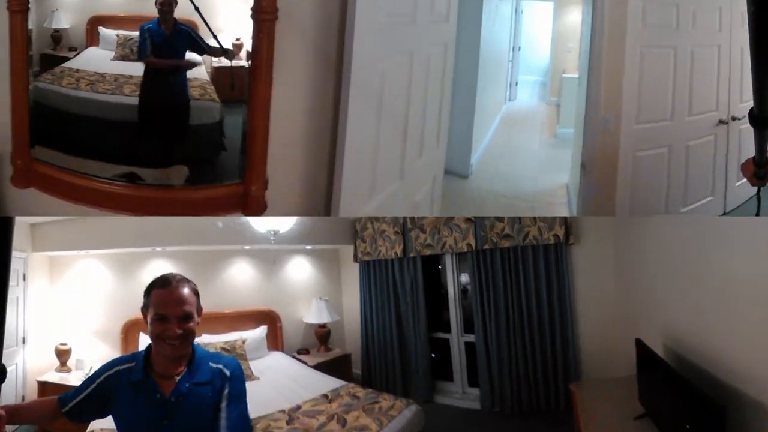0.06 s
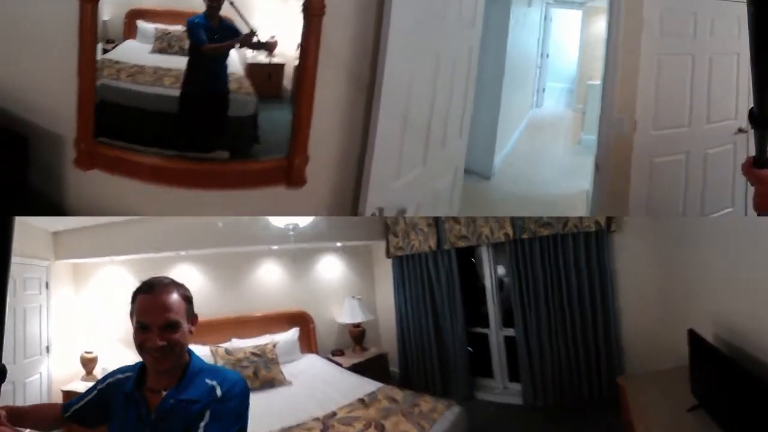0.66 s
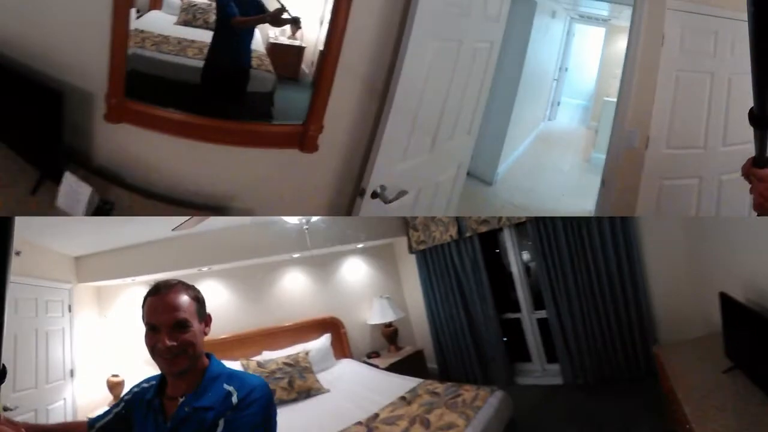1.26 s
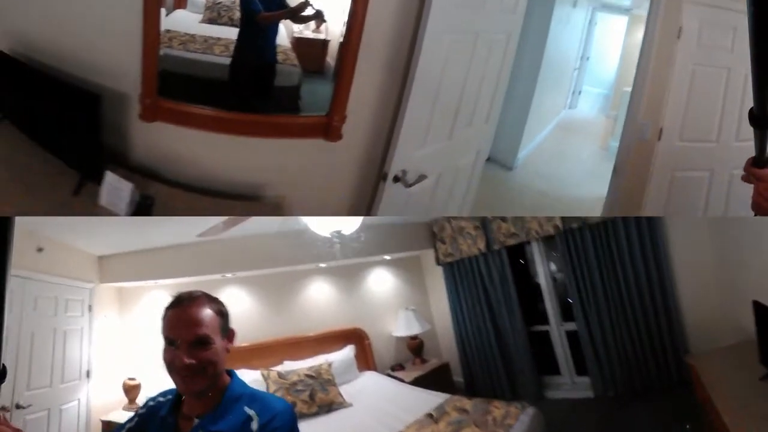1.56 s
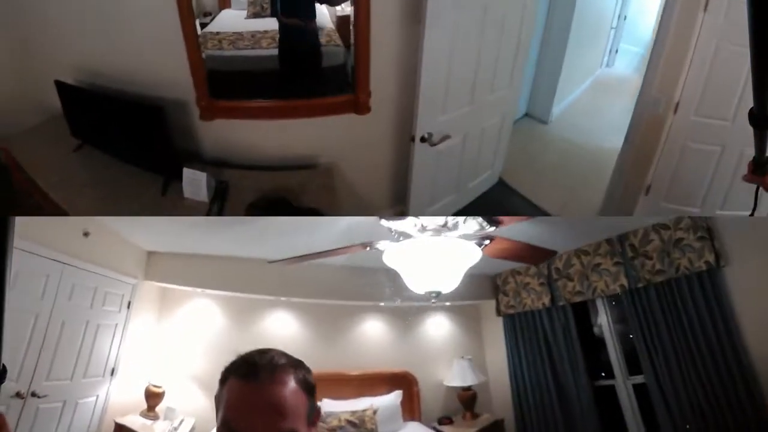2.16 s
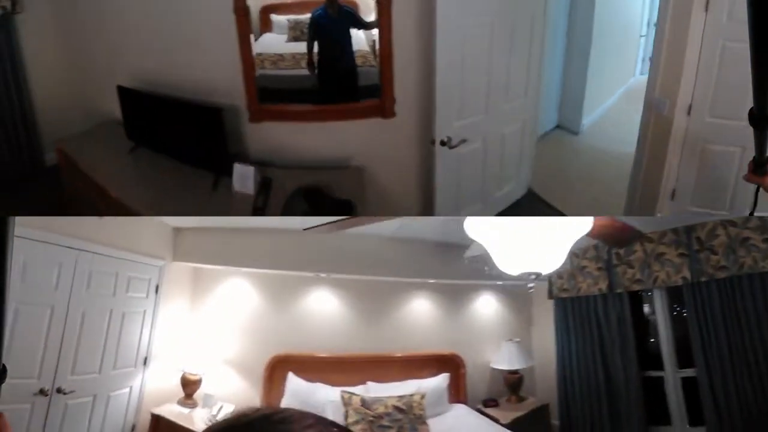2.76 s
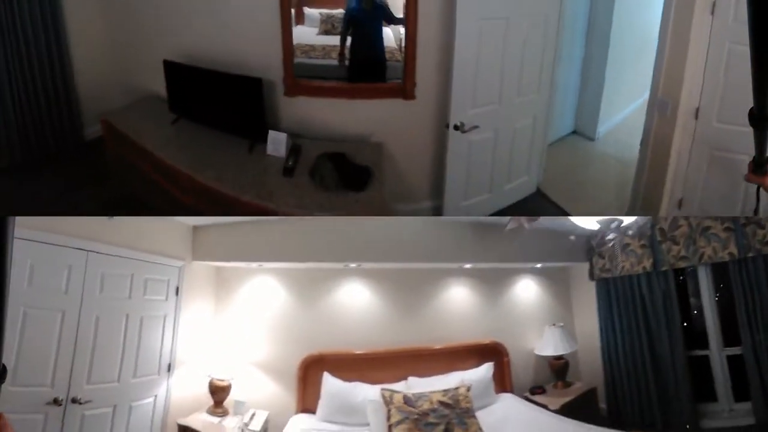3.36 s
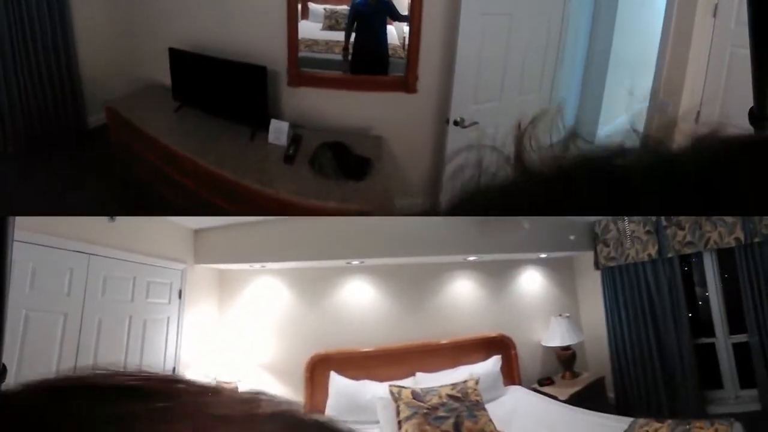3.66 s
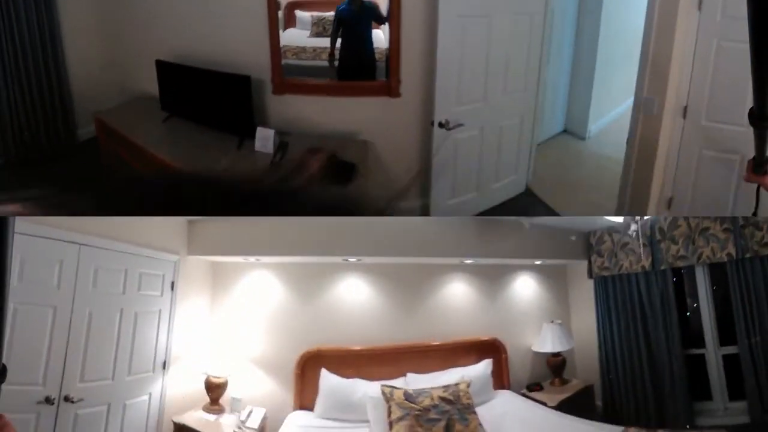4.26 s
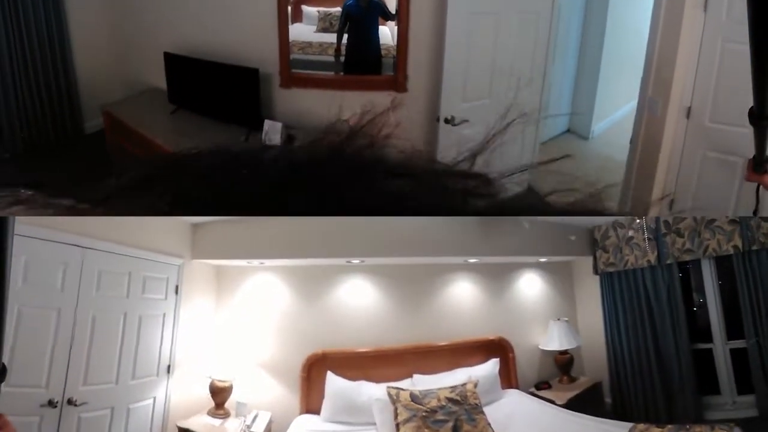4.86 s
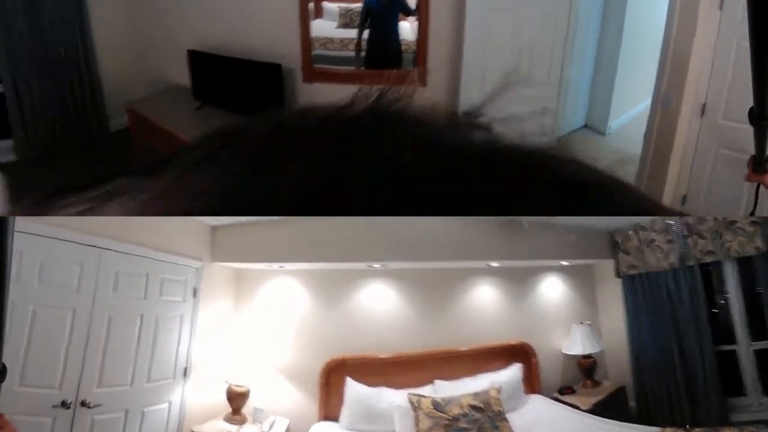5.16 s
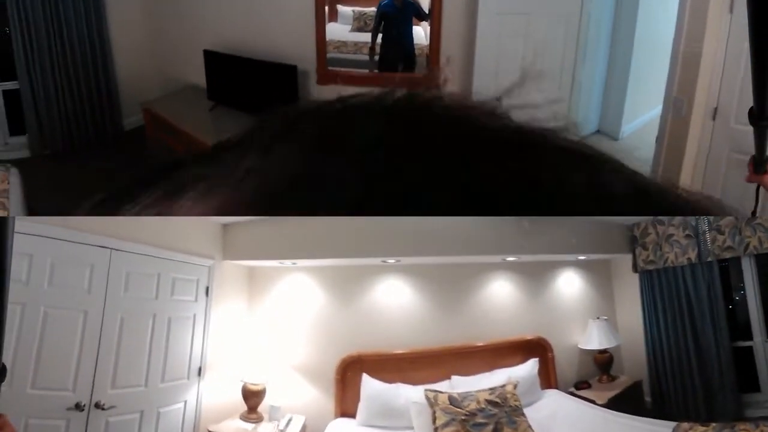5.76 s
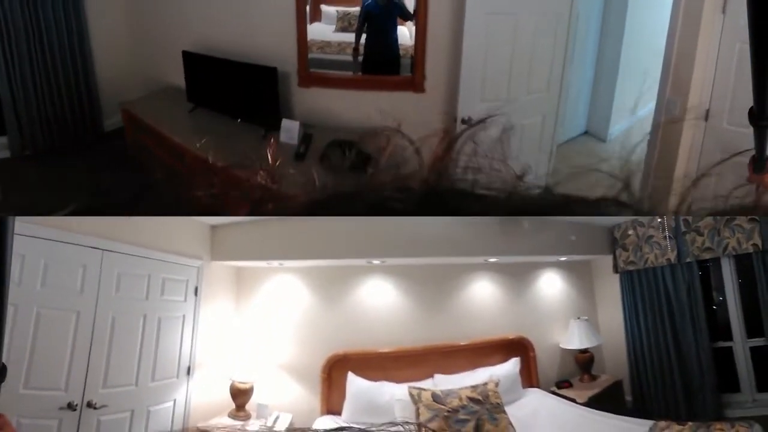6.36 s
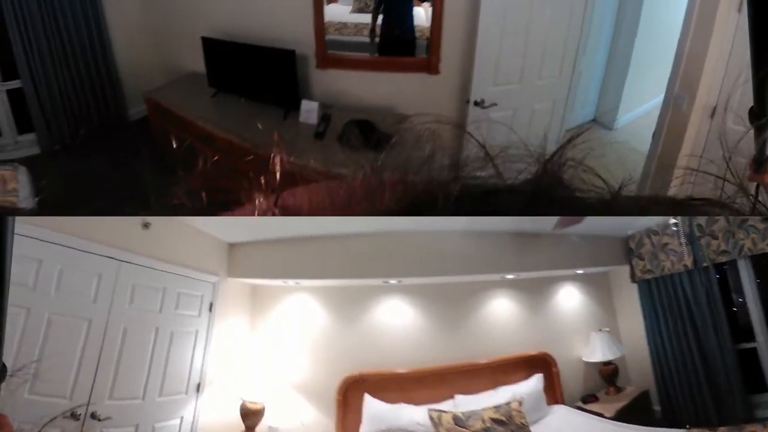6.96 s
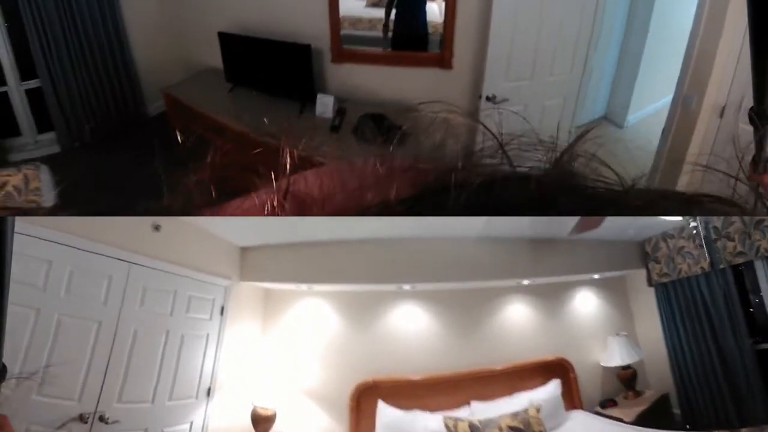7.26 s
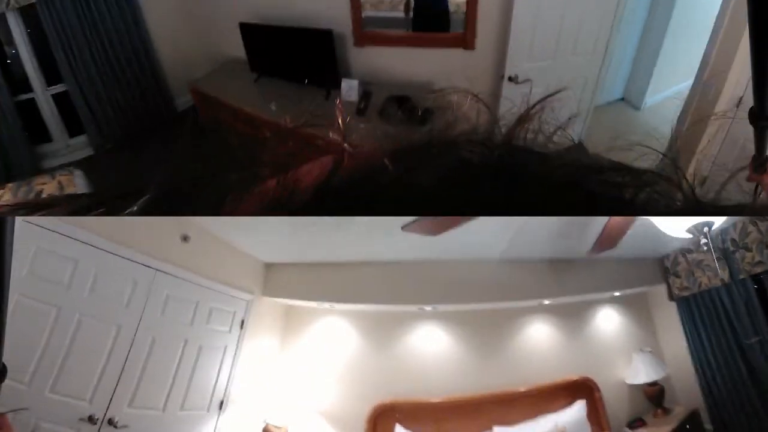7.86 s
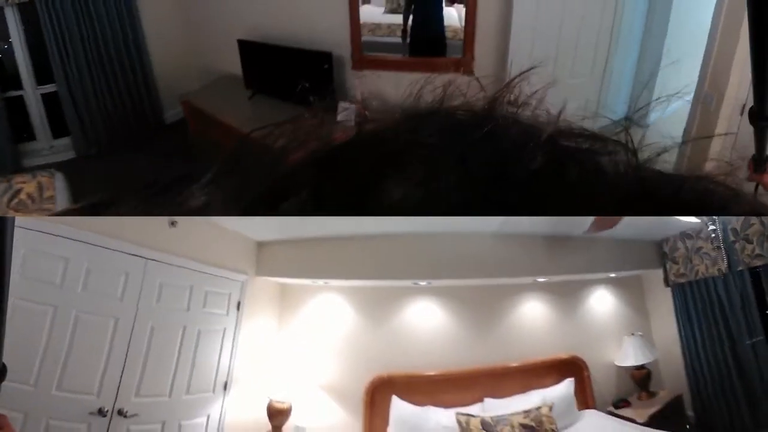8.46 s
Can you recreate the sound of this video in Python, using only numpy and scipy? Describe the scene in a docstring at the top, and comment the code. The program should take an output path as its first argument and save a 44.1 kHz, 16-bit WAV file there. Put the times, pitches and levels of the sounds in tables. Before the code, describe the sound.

Hair scrapes and ticks against a camera on a pole, with handling rumble, creaks and two heavy knocks in a quiet room.

```python
"""Pole camera lowered onto hair

A small camera on a hand-held pole meets a head of hair in a quiet bedroom. Nearly everything reaches
the microphones through the case: the pole hums and creaks in the grip, hair scrapes and ticks on the
shell, fingers tap it, and two heavy knocks overload the input."""
import sys
import numpy as np
from scipy import signal
from scipy.fft import rfft, irfft
from scipy.io import wavfile
from scipy.ndimage import uniform_filter1d

SR = 44100
rng = np.random.default_rng(int(sys.argv[2]) if len(sys.argv) > 2 else 0)


def wav_out(sig):
    """Save sig, one row per channel (or a flat mono array), as 16-bit PCM at SR to the path in sys.argv[1]."""
    wavfile.write(sys.argv[1], SR, np.round(np.clip(np.atleast_2d(sig).T, -1, 1) * 32767).astype(np.int16))


N = 384552
T = np.arange(N) / SR
BIN_HZ = np.arange(N // 2 + 1) * SR / N + 1e-3

# Source spectra. Each row: frequency in Hz, relative level in dB.
VENT_SPECTRUM = [(20, -3), (55, 14), (110, 7.5), (200, -10.5), (300, -19), (400, -4.5), (600, -17),
                 (1000, -12), (1500, -56.5), (4000, -27.5)]
HISS_SPECTRUM = [(100, 15), (1000, 2), (2500, -0.5), (5000, -4), (9000, -6), (14000, -8.5)]
RUMBLE_SPECTRUM = [(12, -16.5), (25, -13.5), (40, -3), (58, 4.5), (80, -7), (105, 4), (135, -9.5),
                   (165, -18.5), (215, -11.5), (280, -21), (350, -16), (450, -30.5), (900, -61)]
SWISH_SPECTRUM = [(500, 5.5), (900, -1), (1600, -4), (2100, -5.5), (3200, -4.5), (4300, -15), (5300, -4),
                  (6000, -5.5), (6900, -2.5), (8300, -20), (14000, -20)]
JOLT_SPECTRUM = [(12, -22), (28, -8.5), (52, 1.5), (80, -4), (140, -15), (220, -27), (600, -64)]
SCUFF_SPECTRUM = [(60, 1), (160, 8), (250, 27), (500, -18), (900, 2.5), (1400, -12.5), (3000, -14),
                  (6000, -43), (14000, -58)]
SLIDE_SPECTRUM = [(50, -39), (130, -11.5), (230, 4.5), (290, -4.5), (360, 7), (480, -8.5), (560, -21),
                  (650, -3), (850, -11), (1100, -23), (1550, -22.5), (2000, -31), (2400, -23), (9000, -66)]
SLIP_SPECTRUM = [(40, -27), (100, -16), (210, 2.5), (280, -2.5), (360, 3), (430, -8), (490, -3.5),
                 (570, -10), (790, -9.5), (950, -23.5), (1200, -46), (4000, -59)]
RATTLE_SPECTRUM = [(200, 5), (500, 5.5), (800, 8), (1300, 1), (2000, -4.5), (3300, -3), (5000, -16),
                   (7200, -11), (9000, -28), (15000, -35)]
TICK_SPECTRUM = [(400, -11), (1100, 0), (1500, 1.5), (2100, 11.5), (2600, 13), (3200, 7.5), (4200, 4.5),
                 (5500, 6.5), (7000, 5), (9000, -4), (15000, -50)]

# Right port against left as the case rocks. Each row: frequency in Hz, phase lag in radians.
PORT_LAG = [(10, 0.4), (50, 0.66), (100, 1.42), (250, 1.81), (600, 1.75), (950, 1.7), (1300, 1.06),
            (2000, -1.8), (3200, -1.71)]
# Modes of pole and case. Each row: nominal frequency in Hz, relative level in dB, free T60 in seconds.
CASE_MODES = [(59, 2.5, 0.4), (105.7, 3.5, 0.43), (143.5, 2.5, 0.15), (223, 0.5, 0.088), (318, 2.5, 0.076),
              (365.2, 0.5, 0.09), (480, -5.5, 0.047), (654, -11.5, 0.085), (763.5, -6, 0.13),
              (860, -0.5, 0.081), (962, -2.5, 0.037), (1224, -0.5, 0.03), (1606, 1, 0.038),
              (2343, 7, 0.081), (2690, 6.5, 0.032), (3460, 2, 0.049)]
# Pole bending modes. Each row: frequency in Hz, width of its wander in Hz, relative level in dB.
POLE_MODES = [(53.54, 3.76, -8.5), (126.5, 7.4, -22)]
# Shell resonances. Each row: frequency in Hz, nominal width in Hz, left and right relative gain in dB.
SHELL_MODES = [(761, 91, 19, 19), (1310, 210, 5.5, 7), (2060, 296, 10.5, 10), (2590, 208, 3.5, 16),
               (3150, 450, 9, 10), (3910, 1340, -1.5, 0.5), (4830, 870, 0.5, -6.5), (6480, 760, 3.5, -30),
               (8160, 2700, -12.5, -18)]

# Envelopes of vent hum, hand tremor and resting hair. Each row: time in seconds, relative level in dB.
HUM_LEVELS = [(0, -63), (1.0, -56.5), (2.0, -63), (2.3, -72), (8.72, -67.5)]
TREMOR_LEVELS = [(1.78, -45.5), (2.078, -52.5), (2.164, -46.5), (2.432, -58), (2.7, -43.5), (3.004, -42),
                 (3.044, -53), (3.12, -68)]
HAIR_REST_LEVELS = [(4.4, -82), (4.5, -68), (5.1, -69), (5.48, -72), (7.1, -72), (7.8, -73), (8.72, -75.5)]

# Rubbing of sleeve, hand and mount.
# Each row: start in seconds, length in seconds, crest position 0-1, relative level in dB.
SLEEVE_SWISHES = [(.29, 0.23, 0.77, -52.5), (1.637, 0.087, 0, -53.5), (1.725, 0.028, .6, -53)]
HAND_SLIDES = [(.655, 0.064, 0.25, -43.5), (.83, 0.13, .55, -43), (.98, 0.25, 0.34, -53),
               (1.28, 0.14, 0.13, -51), (1.465, 0.041, 0.24, -52), (1.57, 0.014, 0.6, -52)]
MOUNT_CREAKS = [(3.2, .18, 0.9, -58), (3.83, .23, 0, -49.5), (4.46, .035, 0.6, -47),
                (4.735, 0.094, 0.3, -46), (4.87, 0.079, 0.4, -46), (5.11, 0.029, .5, -48),
                (5.425, 0.021, 0.4, -50), (5.85, 0.16, 0.6, -50.5), (6.29, 0.26, .9, -45.5),
                (6.91, 0.12, .4, -52.5), (7.19, 0.195, 0, -57), (7.48, 0.23, 0.9, -51),
                (7.725, 0.14, 0.15, -45), (7.89, 0.025, 0.4, -47), (8.05, .18, 0.96, -49.5),
                (8.34, 0.25, 0.9, -57.5)]
# Hair crossing the shell. Each row: the same four, then relative treble in dB.
HAIR_STROKES = [(4.59, 0.56, .3, -64.5, -5), (5.142, .11, 0.35, -64.5, 4), (5.28, .045, 0.5, -66, 6),
                (5.363, 0.061, 0.26, -60, 5), (5.503, .19, 0.04, -61.5, 2), (5.808, 0.18, 0.51, -51, -6.5),
                (6.1, 0.25, 0.17, -60, -6.5), (6.362, .16, 0.73, -48.5, -6.5),
                (6.616, .075, 0.13, -55.5, -6.5), (7.194, 0.12, 0.4, -62, -11), (7.286, .12, 0.12, -57, -2),
                (7.44, 0.057, 0.7, -64.5, -9), (7.512, 0.1, 0.1, -53.5, -5.5), (7.87, 0.26, 0.37, -65, -2),
                (8.296, 0.15, 0, -65.5, -1.5)]

# Single jolts, thuds and slips. Each row: start in seconds, relative level in dB.
HAND_JOLTS = [(.6, -47), (0.664, -36.5), (.87, -44), (1.27, -53), (1.73, -42), (3.168, -46), (3.4, -48),
              (3.62, -43.5), (3.784, -35), (3.84, -40), (3.93, -53), (4.17, -47.5), (4.51, -45.5),
              (4.69, -44), (5.55, -46), (5.77, -45.5), (5.935, -41.5), (6.093, -37.5), (6.2, -50),
              (6.3, -40.5), (6.45, -36.5), (6.6, -47), (6.81, -53), (6.95, -52), (7.105, -44.5)]
PALM_THUDS = [(0.687, -35), (1.253, -37), (1.568, -38.5), (1.651, -28), (1.728, -32.5)]
MOUNT_SLIPS = [(3.259, -38.5), (3.924, -42), (3.951, -35), (4.005, -37.5), (4.153, -43.5), (4.691, -32),
               (4.734, -32), (4.757, -31), (4.78, -33.5), (4.8, -29.5), (4.828, -33.5), (4.871, -33.5),
               (4.919, -33.5), (6.296, -44), (7.822, -40), (7.895, -36.5)]
# Taps on pole and case. Each row: start in seconds, then relative level, bass, upper mid, treble in dB.
FINGER_TAPS = [(0.606, -34.5, -2, -15, -11), (0.672, -34, 2.5, -10, -19), (0.895, -32.5, -16, -33, -34),
               (1.634, -25.5, -7, -17, -26.5), (3.789, -16, -16, -23, -32.5), (3.872, -28.5, -11, -11, -21),
               (4.325, -34.5, -8, -14, -32), (5.021, -21, -6.5, -14, -15), (6.557, -31.5, -25, -5.5, -44),
               (6.565, -33.5, -6, -19, -31), (7.097, -31, -19, -7.5, -40), (8.697, -35, -11, -22, -19.5)]
# Heavy knocks. Each row: start in seconds, thump gain in dB, initial pitch in Hz, rise in seconds,
# decay in seconds, ring gain in dB, rattle gain in dB.
KNOCKS = [(3.517, 9, 123.6, 0.0082, 0.011, -21.5, -31), (4.2482, 15, 188.3, 0.0045, 0.0098, -15, -29)]
# Hairs snapping off the shell; cracks and rebound of the knocks.
# Each row: start in seconds, relative level in dB, treble shelf in dB.
TICKS = [(3.519, -36, 12), (3.5254, -14, 4.5), (3.552, -30, -17), (3.874, -39.5, 1), (4.25, -11.5, 0),
         (4.2586, -6.5, 2.5), (4.631, -37.5, -7), (4.7152, -43.5, -2), (5.0201, -37, 0), (5.1274, -42.5, 9),
         (5.8344, -24.5, -13), (6.4916, -41, -2), (6.6174, -34, -4), (6.762, -23, -7.5),
         (7.408, -32.5, 1.5), (7.7615, -42, -1), (8.1303, -35.5, -2)]


def undb(db):
    """Decibels to gain."""
    return 10 ** (np.asarray(db) / 20)


def unit(x):
    """Scale to rms 1."""
    return x / np.sqrt(np.mean(x ** 2))


def over_hz(points, hz):
    """Interpolate (Hz, value) points on a log-frequency axis."""
    point_hz, value = np.transpose(points)
    return np.interp(np.log(hz), np.log(point_hz), value)


def swell(rows):
    """Smoothed gain from (s, dB) rows, silent outside them."""
    time_s, db = np.transpose(rows)
    gain = undb(np.interp(T, time_s, db)) * (T >= time_s[0]) * (T <= time_s[-1])
    return uniform_filter1d(gain, size=400)


def colour(x, spectrum):
    """Minimum-phase filter with the given (Hz, dB) response."""
    cepstrum = irfft(np.log(undb(over_hz(spectrum, BIN_HZ))), N)
    cepstrum[1:N // 2] *= 2
    cepstrum[N // 2 + 1:] = 0
    return irfft(rfft(x) * np.exp(rfft(cepstrum)), N)


def noise(spectrum, shape=N):
    """Coloured noise, rms 1."""
    return unit(colour(rng.standard_normal(shape), spectrum))


def walk(rate_hz):
    """Slow random drift, rms 1."""
    hold = int(SR / rate_hz)
    steps = np.repeat(rng.standard_normal(N // hold + 1), hold)[:N]
    return unit(uniform_filter1d(steps, hold))


def grains(per_s, spread_db):
    """Random tiny impacts of uneven size."""
    impulses = (rng.random(N) < per_s / SR) * rng.choice([-1, 1], N)
    return unit(impulses * undb(spread_db * np.clip(rng.standard_normal(N), -2, 2)))


def add(track, start_s, sound):
    """Mix a sound in at start_s."""
    i = int(start_s * SR)
    track[i:i + len(sound)] += sound[:N - i]


def ports(x, right_db=-1.28):
    """Case vibration at the left and right microphones."""
    lagged = irfft(rfft(x) * np.exp(-1j * over_hz(PORT_LAG, BIN_HZ)), N)
    return np.array([x, undb(right_db) * lagged])


def stroke(start_s, length_s, crest, db, sag_db, edge_s):
    """Gain of one rub: takes hold, presses up to its crest, eases, lets go."""
    end_s = start_s + length_s
    arch_db = np.interp(T, [start_s, start_s + crest * length_s, end_s], [-sag_db, 0, -sag_db])
    gate = np.interp(T, [start_s - edge_s, start_s, end_s, end_s + edge_s], [0, 1, 1, 0])
    return undb(db + arch_db) * gate


def movements(rows, sag_db, edge_s):
    """Summed gain of a table of rubs."""
    return sum(stroke(*row, sag_db, edge_s) for row in rows)


def release(samples, chatter, chatter_s):
    """An impulse with decaying chatter, energy 1."""
    burst = chatter * rng.standard_normal(samples) * np.exp(-T[:samples] / chatter_s)
    burst[0] = 1
    return burst / np.linalg.norm(burst)


def damped_body(force, spectrum):
    """Body response; a unit impulse peaks at 1."""
    return colour(force, spectrum) / np.abs(colour(1. * (T == 0), spectrum)).max()


def snaps(rows, spectrum, chatter, chatter_s):
    """Sudden releases through a damped body."""
    force = np.zeros(N)
    for start_s, db, *_ in rows:
        add(force, start_s, undb(db) * release(4096, chatter, chatter_s))
    return damped_body(force, spectrum)


def thump(start_hz, rest_hz, glide_s, rise_s, decay_s):
    """A few cycles, sinking in pitch as the contact relaxes."""
    t = T[:SR // 2]
    cycles = np.cumsum(rest_hz + (start_hz - rest_hz) * np.exp(-t / glide_s)) / SR
    return np.sin(2 * np.pi * cycles) * (1 - np.exp(-(t / rise_s) ** 2)) * np.exp(-t / decay_s)


def ventilation(air_db=-56.5, hum_hz=350.6):
    """Moving air with a faint, wavering hum."""
    air = ports(noise(VENT_SPECTRUM)) * undb(air_db + 1.3 * walk(5))
    hum = np.sin(2 * np.pi * np.cumsum(hum_hz + 1.6 * walk(4.9)) / SR)
    return air + ports(hum) * swell(HUM_LEVELS) * undb(2 * walk(5.5))


def hiss(gain_db=-62):
    """Each microphone's own noise."""
    return noise(HISS_SPECTRUM, (2, N)) * undb(gain_db)


def rumble(pressure, sliding, strain, hold_db=-62, hair_db=9.5, slide_db=1, strain_db=-1):
    """Hair, hand and mount shake the pole dully, on top of the unsteady hold."""
    hold = undb(hold_db + 3 * walk(4))
    drives = [hold, undb(hair_db) * pressure, undb(slide_db) * sliding, undb(strain_db) * strain]
    return ports(noise(RUMBLE_SPECTRUM) * np.sqrt(sum(drive ** 2 for drive in drives)))


def sleeve(gain_db=1):
    """A sleeve brushes past in brief swishes."""
    rubbing = movements(SLEEVE_SWISHES, sag_db=10, edge_s=0.012)
    return noise(SWISH_SPECTRUM, (2, N)) * rubbing * undb(gain_db)


def jolts(rise_s=0.0085, decay_s=0.052, gain_db=5):
    """Each jolt of the hand starts a deep, short sway of the pole."""
    sway, t = np.zeros(N), T[:SR // 2]
    for start_s, db in HAND_JOLTS:
        add(sway, start_s, undb(db + gain_db) * (1 - np.exp(-t / rise_s)) * np.exp(-t / decay_s))
    return ports(noise(JOLT_SPECTRUM) * sway)


def case_ring(bass_db, mid_db, treble_db, loss_db_per_cycle=0, scatter_db=2, detune=0.0207):
    """Modes after one blow; place and hardness of the contact set their shares."""
    hz, db, t60_s = np.transpose(CASE_MODES)[:, :, None]
    t = T[:SR // 2]
    level_draw, pitch_draw = rng.standard_normal((2, len(hz), 1))
    contact = [(130, bass_db), (260, 0.0077), (800, 0.0045),
               (1100, mid_db), (1450, mid_db), (2000, treble_db)]
    polarity = (-1) ** np.arange(len(hz))[:, None]
    share = polarity * undb(db + scatter_db * level_draw + over_hz(contact, hz))
    decay = undb(-60 * t / t60_s - loss_db_per_cycle * hz * t)
    return np.sum(share * np.sin(2 * np.pi * hz * (1 + detune * pitch_draw) * t) * decay, axis=0)


def taps(ring_db=-5, scuff_db=-16):
    """A finger scuffs and rings the case, damping it as it stays on."""
    ring = np.zeros(N)
    for start_s, db, *shares_db in FINGER_TAPS:
        add(ring, start_s, undb(db + ring_db) * case_ring(*shares_db, loss_db_per_cycle=0.35))
    scuff = snaps(FINGER_TAPS, SCUFF_SPECTRUM, chatter=0.12, chatter_s=0.013)
    return ports(ring + undb(scuff_db) * scuff)


def grip(sliding, slide_db=4, catch_db=2, skin_db=-70, knee_db=-62):
    """The hand slides and catches on the pole; skin hiss levels off above the knee."""
    friction = unit(colour(grains(per_s=700, spread_db=0.5), SLIDE_SPECTRUM))
    slide = friction * sliding * undb(slide_db + catch_db * walk(45.2))
    skin = unit(irfft(rfft(rng.standard_normal(N)) * resonance(hz=2280, width_hz=2200) ** 2, N))
    return ports(slide + skin * np.tanh(sliding / undb(knee_db)) * undb(skin_db))


def resonance(hz, width_hz):
    """Response of one resonance, gain 1 at its centre."""
    return 1 / (1 + 1j * (BIN_HZ ** 2 - hz ** 2) / (BIN_HZ * width_hz))


def thuds(gain_db=3):
    """The palm meets the pole; pitch sinks as the flesh gives."""
    body = np.zeros(N)
    thud = thump(start_hz=185, rest_hz=95, glide_s=0.033, rise_s=0.0068, decay_s=0.019)
    for start_s, db in PALM_THUDS:
        add(body, start_s, undb(db + gain_db) * thud)
    return ports(body)


def pole_hum(gain_db=-1, waver_db=1, waver_hz=7.3):
    """Hand tremor drives the bending modes, wavering in level and pitch."""
    bends = np.zeros(N)
    for hz, width_hz, db in POLE_MODES:
        gain = undb(db + waver_db * walk(waver_hz))
        pitch_hz = hz + width_hz / 2 * walk(waver_hz)
        bends += gain * np.sin(2 * np.pi * np.cumsum(pitch_hz) / SR)
    return ports(unit(bends) * swell(TREMOR_LEVELS) * undb(gain_db))


def mount(strain, small_slip_db=-5, slip_db=3):
    """Stick-slip under load: a fine creak, small random slips, louder single ones."""
    fine = grains(per_s=260, spread_db=1.5)
    small_slips = undb(small_slip_db) * grains(per_s=53, spread_db=6.5)
    creak = unit(colour(fine + small_slips, SLIP_SPECTRUM)) * strain
    slips = snaps(MOUNT_SLIPS, SLIP_SPECTRUM, chatter=0.07, chatter_s=0.0093)
    return ports(creak + undb(slip_db) * slips)


def knocks(rest_hz=44, glide_s=0.01146, rattle_s=0.019):
    """A heavy thump; the case rings and loose parts rattle."""
    body, shaking = np.zeros(N), np.zeros(N)
    for start_s, db, start_hz, rise_s, decay_s, ring_db, rattle_db in KNOCKS:
        blow = undb(db) * thump(start_hz, rest_hz, glide_s, rise_s, decay_s)
        ring = undb(ring_db) * case_ring(bass_db=-9, mid_db=-37, treble_db=-43)
        add(body, start_s, blow + ring)
        add(shaking, start_s, undb(rattle_db) * np.exp(-T[:SR // 2] / rattle_s))
    rattle = colour(grains(per_s=1200, spread_db=4), RATTLE_SPECTRUM)
    return ports(body) + shaking * unit(ports(rattle))


def ticks(gain_db=3, right_boost_db=1, samples=1024):
    """Dry snaps with a tiny chatter; harder contact is brighter."""
    force = np.zeros(N)
    shelf = over_hz([(2500, 0), (6000, 1)], np.arange(1, samples // 2 + 2) * SR / samples)
    for start_s, db, treble_db in TICKS:
        burst = release(samples, chatter=0.14, chatter_s=0.0016)
        burst = np.roll(burst, 16)  # room for the shelf's pre-ring
        add(force, start_s, undb(db) * irfft(rfft(burst) * undb(treble_db * shelf)))
    return ports(damped_body(force, TICK_SPECTRUM)) * undb(gain_db + np.array([[0], [right_boost_db]]))


def hair_contact(sag_db=6, edge_s=0.034, rest_treble_db=-1):
    """Hair pressure on the shell, and treble gain led by the strongest stroke."""
    strokes = [stroke(*row[:4], sag_db, edge_s) for row in HAIR_STROKES]
    power = np.array(strokes + [swell(HAIR_REST_LEVELS)]) ** 2
    treble_db = np.array([row[4] for row in HAIR_STROKES] + [rest_treble_db])
    total = power.sum(axis=0) + 1e-18
    return np.sqrt(total), undb(treble_db @ power / total)


def strands(stiff_db=-3.5):
    """Many fine hairs scrape; a few stiff ones crackle."""
    return grains(per_s=5000, spread_db=2) + undb(stiff_db) * grains(per_s=90, spread_db=1.5)


def hair(pressure, treble_gain, gain_db=5, treble_db=3, flicker_db=1.5, shared=0.58, split_hz=4500):
    """Strands catch and let go, ringing the shell; each port also has its own strands."""
    common, channels = ports(strands()), []
    for port in range(2):
        own = strands()
        bands = [(hz, undb(db[port]) * resonance(hz, 2 * width_hz) ** 2)
                 for hz, width_hz, *db in SHELL_MODES]
        low = sum(band for hz, band in bands if hz < split_hz)
        high = sum(band for hz, band in bands if hz >= split_hz)
        # Low modes move the whole shell; high ones stay near their port.
        whole = irfft(rfft(shared * common[port] + (1 - shared) * own) * low, N)
        local = irfft(rfft(own) * high, N)
        channels.append(whole + treble_gain * undb(treble_db) * local)
    return unit(np.array(channels)) * pressure * undb(gain_db + flicker_db * walk(70))


def scene():
    """Rubbing and its rumble, pole hum, blows and background, in stereo."""
    pressure, treble_gain = hair_contact()
    sliding = movements(HAND_SLIDES, sag_db=8.5, edge_s=0.025)
    strain = movements(MOUNT_CREAKS, sag_db=3.5, edge_s=0.0071)
    rubbing = hair(pressure, treble_gain) + grip(sliding) + sleeve() + mount(strain)
    shaking = rumble(pressure, sliding, strain) + pole_hum() + jolts()
    blows = thuds() + knocks() + taps() + ticks()
    return rubbing + shaking + blows + ventilation() + hiss()


def record(dry, faint_db=-25, step_at_s=0.598, step_s=0.0049, ceiling=0.37, top_hz=14400):
    """The level starts faint and steps up; the input flattens the knocks; the top is cut."""
    stepped = dry * undb(np.interp(T, [step_at_s, step_at_s + step_s], [faint_db, 0]))
    clipped = stepped / (1 + (stepped / ceiling) ** 8) ** (1 / 8)
    lowpass = signal.ellip(10, 0.2, 70, top_hz, fs=SR, output="sos")
    return signal.sosfilt(lowpass, clipped)


dry = scene()
out = record(dry)
wav_out(out)
```